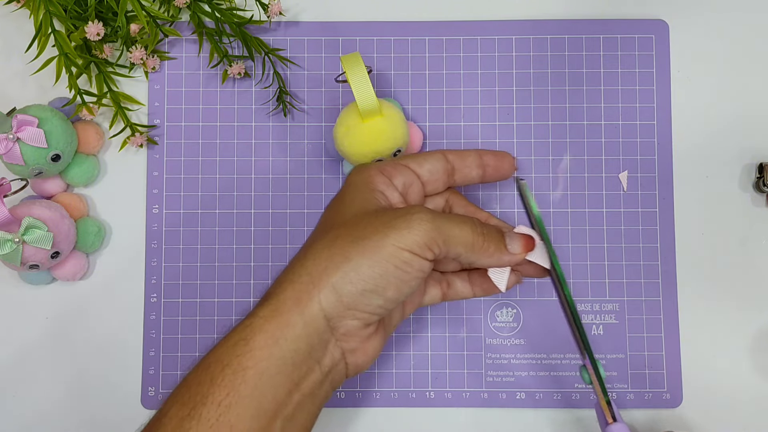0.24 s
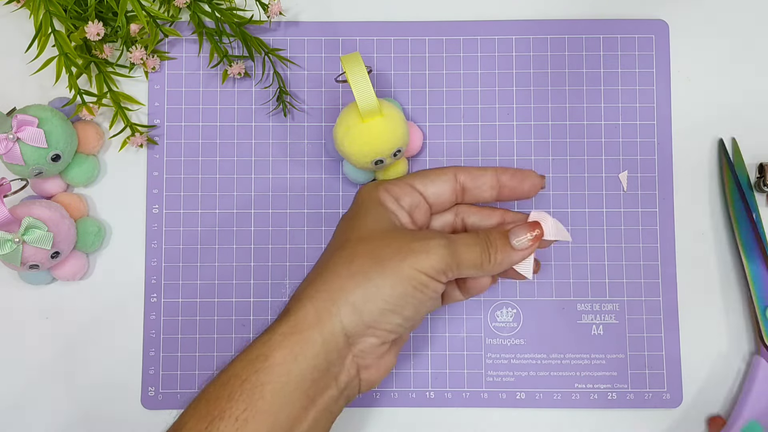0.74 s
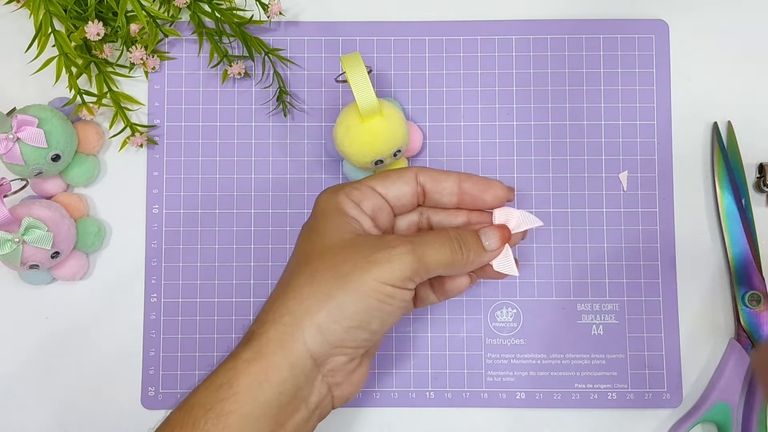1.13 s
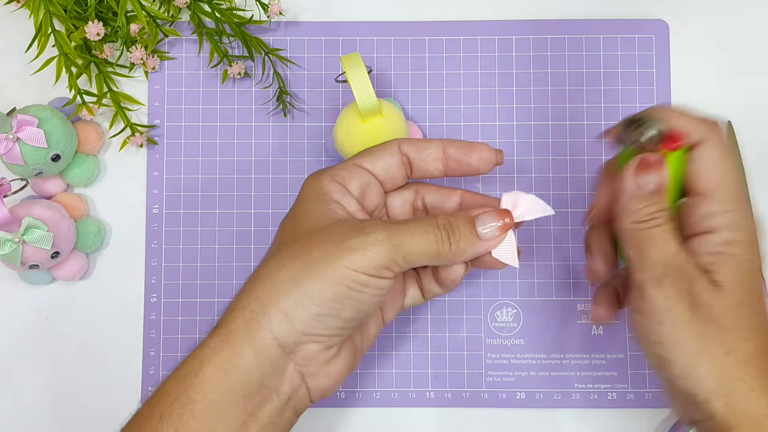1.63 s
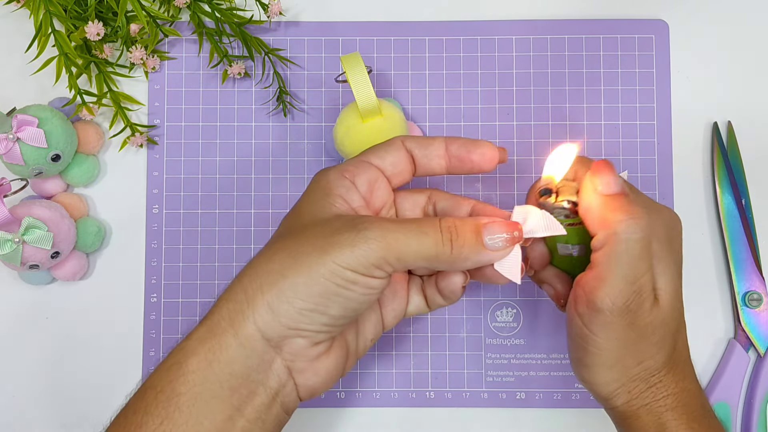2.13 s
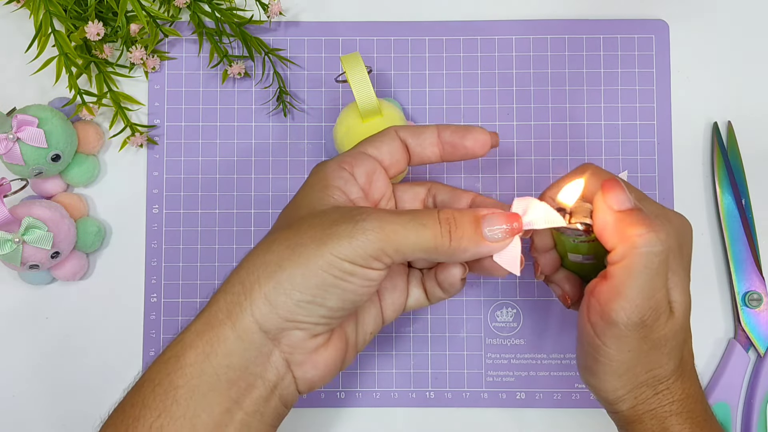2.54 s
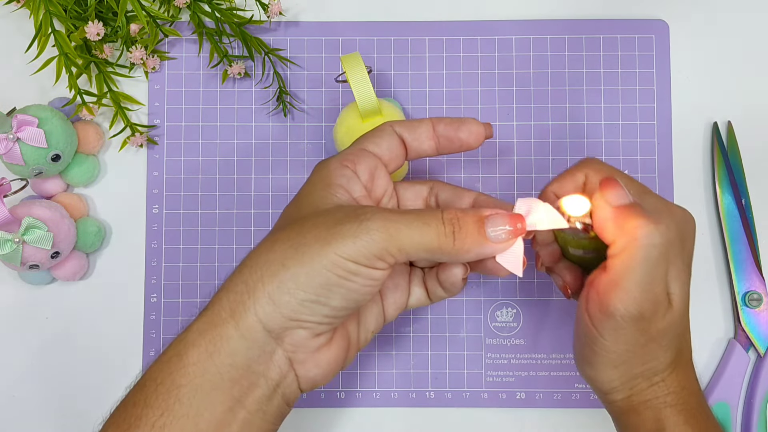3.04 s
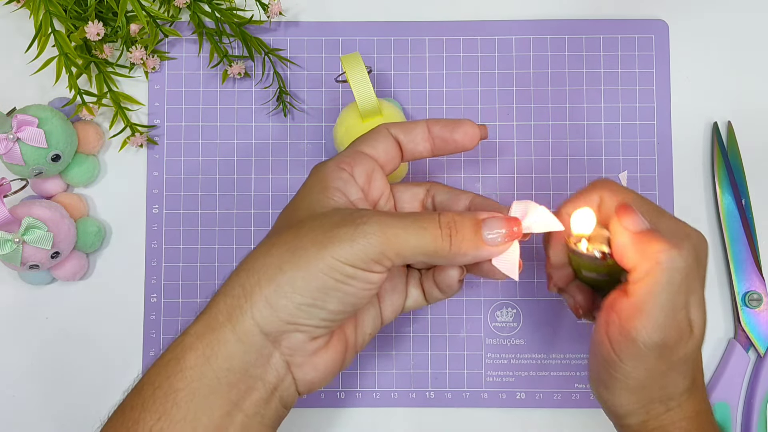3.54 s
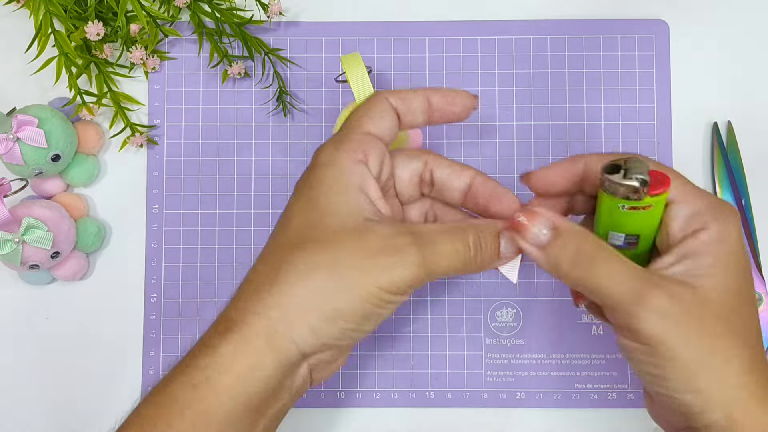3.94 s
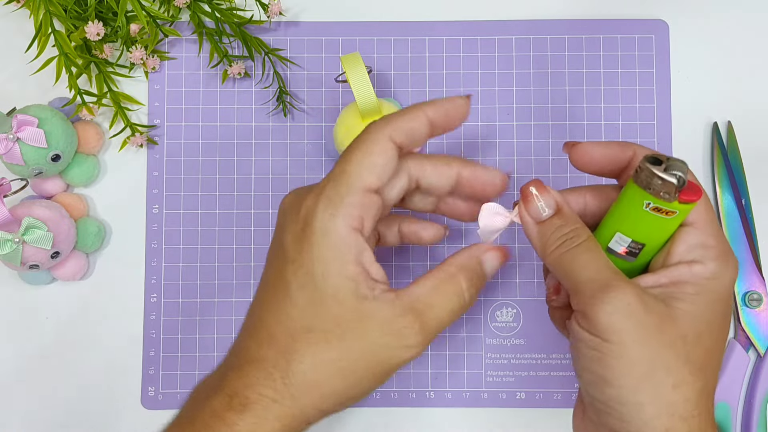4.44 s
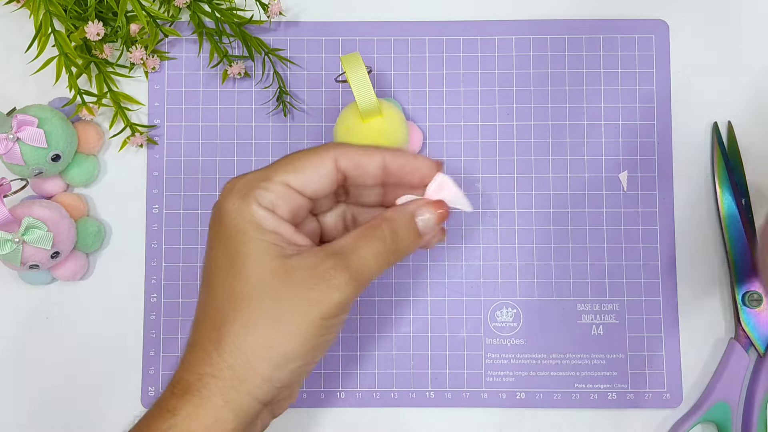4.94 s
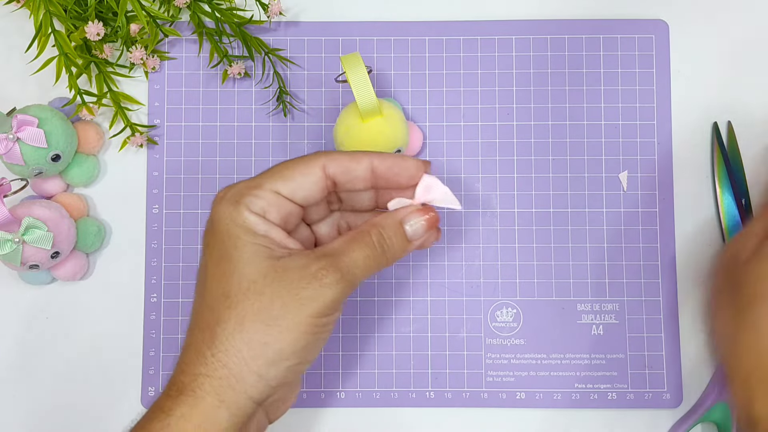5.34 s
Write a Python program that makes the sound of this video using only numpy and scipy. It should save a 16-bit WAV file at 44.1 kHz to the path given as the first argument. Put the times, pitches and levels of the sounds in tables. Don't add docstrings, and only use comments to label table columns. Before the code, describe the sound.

Soft low room noise lies under everything. Scissors give one thin quiet snip, then clack and thud loudly onto a matted table top and settle. Fingers rustle lightly; a lighter flint gives a quick bright zip ending in a tiny click. Small release clicks and near silence follow before the lighter lands hard, rattles and settles. Close microphone, short room tail, loudest hits squashed and overloaded.

```python
import sys
import numpy as np
from scipy import signal
from scipy.io import wavfile
from scipy.ndimage import uniform_filter1d

SR = 44100
rng = np.random.default_rng(int(sys.argv[2]) if len(sys.argv) > 2 else 0)


def pcm_store(signal):
    levels = np.round(np.clip(np.atleast_2d(signal), -1, 1) * 32767)
    wavfile.write(sys.argv[1], SR, levels.astype(np.int16).T)


def convert_level_to_amplitude(level_db):
    exponent = np.asarray(level_db, float) / 20
    return 10 ** exponent


N = 246959


def rms_one(x):
    return x / np.sqrt(np.mean(x ** 2) + 1e-20)


def at_hz(points, hz):
    table = np.array(points)
    return np.interp(np.log(hz), np.log(table[:, 0]), table[:, 1])


def filt(x, kind, hz, order=2):
    return signal.sosfilt(signal.butter(order, hz, kind, fs=SR, output="sos"), x)


def resonate(x, hz, width_hz):
    r = np.exp(-np.pi * width_hz / SR)
    numerator = (1 - r * r) / 2 * np.array([1, 0, -1])
    return signal.lfilter(numerator, [1, -2 * r * np.cos(2 * np.pi * hz / SR), r * r], x)


def stereo_white(length, alike):
    mid, side = rng.standard_normal((2, length))
    return np.sqrt(.5 + alike / 2) * mid + np.sqrt(.5 - alike / 2) * side * [[1], [-1]]


def bands():
    edges = 14 * 2 ** np.arange(0, 10.2, 1 / 3)
    return list(zip(edges, edges[1:]))


# frequency in Hz, level in dB per Hz.
AIR_SPECTRUM = [(12, 12.5), (24, 0.5), (40, -13.5), (90, -12.5), (180, -13.5), (310, -17.5), (650, -22),
                (1100, -26), (1900, -35), (3500, -42.5), (5500, -45.5), (8500, -41.5), (10500, -40.5),
                (13000, -49)]
# frequency in Hz, left minus right in dB.
AIR_BALANCE = [(60, 8.5), (110, 9.5), (200, 12), (380, 9.5), (700, 9.5), (1290, 9.5), (2380, 6),
               (4400, 1.5), (8120, 1), (15000, -5.5)]
# frequency in Hz, correlation from 0 to 1.
AIR_COHERENCE = [(30, 0), (200, 0.22), (500, 0.01), (1500, 0), (8000, 0)]
# frequency in Hz, width in Hz, level in dB.
AIR_TONES = [(59, 3.5, -48.5), (181, 8.4, -49), (227, 14.6, -53.5), (374, 14, -57.5)]


def air():
    broad, white = 0, rng.standard_normal((2, 2, N + 8000))
    for k, (low, high) in enumerate(bands()):
        hz = np.sqrt(low * high)
        a, b = filt(white[k % 2], "band", [low, high])[:, 8000:]
        alike = at_hz(AIR_COHERENCE, hz)
        left = convert_level_to_amplitude(at_hz(AIR_BALANCE, hz) / 2)
        pair = np.array([left * a, (alike * a + np.sqrt(1 - alike ** 2) * b) / left])
        broad = broad + convert_level_to_amplitude(at_hz(AIR_SPECTRUM, hz)) * pair / np.sqrt(left ** 2 + left ** -2)
    tones = 0
    for hz, width_hz, db in AIR_TONES:
        tones = tones + convert_level_to_amplitude(db) * rms_one(resonate(stereo_white(N, 0.87), hz, width_hz))
    return convert_level_to_amplitude(-37) * rms_one(broad) + tones * convert_level_to_amplitude([[4], [-5]])


def bursts(events, decay_ms, rise_s, alike):
    length = 900
    t = np.arange(length) / SR
    rise = 1 - np.exp(-t / rise_s)
    out = np.zeros((2, 2, N + length))
    for s, bright_db, body_db in events:
        i = round(s * SR)
        for k, (db, decay_s) in enumerate([(bright_db, decay_ms / 1000), (body_db, .004)]):
            shape = rise * np.exp(-t / decay_s)
            burst = rms_one(shape * stereo_white(length, alike))
            out[k, :, i:i + length] += convert_level_to_amplitude(db) * burst * np.sqrt(np.mean(shape ** 2))
    return out[:, :, :N]


def shell(x, modes):
    out = 0
    for k, (hz, width_hz, db) in enumerate(modes):
        out = out + convert_level_to_amplitude(db) * resonate(x, hz, width_hz) * (-1) ** k
    return out


# time in seconds, bright crack in dB, duller body click in dB.
CRACKS = [(.217, -49, -44), (.6636, -36.5, -59), (.7058, 3.5, 0), (.9640, 1.5, 3.5), (1.0335, -20, 3),
          (1.0400, -22, -10), (1.0540, -2.5, 1.5), (1.2935, -26.5, -30), (1.3037, -36, -19),
          (1.3104, -41, -29), (1.3385, -23, -24.5), (1.4155, -26.5, -34), (2.272, -33.5, -51),
          (2.343, -34, -55), (3.7316, -24, -29.5), (3.7444, -33, -38), (3.7544, -33.5, -56),
          (4.0058, -37.5, -52), (4.8744, -41.5, -58), (4.930, -43, -55), (5.1996, -29, 2),
          (5.238, 5.5, 2.5), (5.2665, -8, -6.5), (5.2715, -11, -9), (5.5332, -20, -18),
          (5.5523, -23, -21.5)]
# frequency in Hz, width in Hz, level in dB.
HANDLE_MODES = [(1509, 1540, 0), (1964, 1130, 2.5), (2544, 274, 1.5), (3300, 2320, -13.5)]


def cracks():
    bright, body = bursts(CRACKS, decay_ms=1.68, rise_s=0.00048, alike=0.59)
    return filt(bright, "high", 3000) + convert_level_to_amplitude(12) * shell(body, HANDLE_MODES)


def steel(x, left_db):
    sing = resonate(x, 9070, 1400)
    sing = sing + convert_level_to_amplitude(-20.5) * resonate(x, 7100, 830) + convert_level_to_amplitude(-7.5) * resonate(x, 13600, 3000)
    return (sing + convert_level_to_amplitude(-40.5) * filt(x, "high", 3840)) * convert_level_to_amplitude([[left_db], [-left_db]])


# frequency in Hz, width in Hz, level in dB.
HOOD_MODES = [(2434, 500, 1.5), (3700, 120, 2), (4500, 2100, -6), (5280, 600, -6.5)]


def bites(events):
    bright, body = bursts(events, decay_ms=1.66, rise_s=0.00066, alike=0.1)
    return convert_level_to_amplitude(14) * steel(bright, left_db=4) + convert_level_to_amplitude(11) * filt(shell(body, HOOD_MODES), "high", 1900)


def snip():
    start_s, gap_s = .2545, .0025
    strand_db, swell_db, blade_db = -42, 2.5, -39.5
    return bites([(start_s + gap_s * k, strand_db + swell_db * min(k, 2), blade_db) for k in range(5)])


def strokes(rows, rise_db_s, fall_db_s, clump_db):
    t = np.arange(N) / SR
    level_db = np.full((2, 1, N), -120.)
    for s, held_s, bright_db, body_db in rows:
        swell_loss, fade_loss = rise_db_s * (s - t), fall_db_s * (t - s - held_s)
        loss_db = np.maximum(0, np.maximum(swell_loss, fade_loss))
        level_db[:, 0] = np.maximum(level_db[:, 0], [bright_db - loss_db, body_db - loss_db])
    sticking = rms_one(filt(rng.standard_normal(N), "band", [60, 400]))
    return convert_level_to_amplitude(level_db) * rms_one(convert_level_to_amplitude(clump_db * sticking) * stereo_white(N, .4))


# time of full strength in seconds, hold in seconds,
# bright level in dB, body level in dB.
RUBS = [(.268, .003, -43, -49), (1.586, .01, -54.5, -76), (1.655, 0.00613, -42.5, -66),
        (1.716, 0.02, -44, -59), (1.775, .01, -57, -63), (1.982, .015, -32, -53),
        (2.345, 0.017, -50.5, -62), (3.82, 0.0033, -48, -56), (4.044, 0.0034, -46, -61),
        (4.288, .004, -44, -60), (4.802, 0.003, -46, -58), (4.878, .004, -52.5, -57),
        (4.932, 0.038, -55, -63), (4.98, 0.026, -50.5, -63), (5.045, .012, -50.5, -59)]


def rubs():
    bright, body = strokes(RUBS, rise_db_s=1500, fall_db_s=600, clump_db=2)
    return convert_level_to_amplitude(1.5) * steel(bright, left_db=-0.5) + convert_level_to_amplitude(12.5) * shell(body, HOOD_MODES)


def ring(clicks, hz, t60):
    r, w = convert_level_to_amplitude(-60 / (t60 * SR)), 2 * np.pi * hz / SR
    return signal.lfilter([0, np.sin(w)], [1, -2 * r * np.cos(w), r * r], clicks + 1e-18)


# time in seconds, boom in dB, upper modes in dB, damped push in dB.
THUMPS = [(0.709, -31, -11.5, -1), (0.867, -17, -40.5, -25), (.967, -8.5, -12.5, -8.5),
          (1.025, -9, -7.5, 0.5), (1.034, -13, -6, -25), (1.054, -2.5, -11, -10.5), (1.074, 1, -8, -4.5),
          (1.103, -9, -18, -8), (1.153, -26, -32.5, -17.5), (1.306, -21.5, -22.5, -39),
          (1.341, -18.5, -28.5, -21), (1.363, -23, -32, -21.5), (3.925, -53, -42.5, -44),
          (5.201, -14, -5, -1), (5.238, -47, -24, -25), (5.269, -37, -31, -35), (5.297, -42, -26.5, -32),
          (5.335, -16.5, -23.5, -18.5), (5.418, -29.5, -25.5, -23.5), (5.517, -34, -49, -33.5),
          (5.535, -48, -34.5, -37.5)]
# frequency in Hz, level in dB, t60 in seconds.
TOP_LOW_MODES = [(158, -5, .25), (190, -1, .3), (215, 0, .22), (238, -8, .09), (275, -11, .07),
                 (320, -11, .06)]
# frequency in Hz, level in dB, t60 in seconds.
TOP_UPPER_MODES = [(389, 12.5, 0.026), (453, -14, 0.04), (495, -2, 0.024), (486, 15, 0.019),
                   (604, -3.5, 0.076), (711, 2, 0.082), (741, -0.5, 0.1), (710, 0, 0.017),
                   (782, 8.5, 0.038), (853, -2.5, 0.072), (916, -15, 0.055), (1072, 1.5, 0.034),
                   (1190, -7.5, 0.0082), (1220, -6.5, 0.029), (1290, 7, 0.01)]
# frequency in Hz, level in dB, t60 in seconds.
FRAME_MODES = [(80, -11, 0.074), (99.3, 12.5, 0.2)]
# frequency in Hz, level in dB.
FLEX_PARTIALS = [(222, 2.5), (480, -19), (1030, -14)]


def thumps():
    s, boom_db, upper_db, push_db = np.transpose(THUMPS)
    at, out = np.round(s * SR).astype(int), np.zeros((2, N))
    # modes, level in dB, channel difference; the frame sways with a share of each boom
    groups = [(TOP_LOW_MODES, boom_db - 10, .1), (TOP_UPPER_MODES, upper_db - 8, .6),
              (FRAME_MODES, boom_db - 30, .15)]
    for modes, level_db, apart in groups:
        for hz, db, t60 in modes:
            clicks = np.zeros((2, N))
            chance = rng.standard_normal((len(at), 5))
            late = (np.abs(chance[:, 4]) * .003 * SR).astype(int)
            size = convert_level_to_amplitude(level_db + db + 2 * chance[:, 0]) * np.sign(chance[:, 3])
            clicks[:, at + late] = size * (1 + apart * chance[:, 1:3].T)
            out += ring(clicks, hz, t60 if hz < 350 else min(t60, .07))
    t, push_s = np.arange(1500) / SR, 0.0099
    flex = sum(convert_level_to_amplitude(db) * np.sin(2 * np.pi * hz * t) for hz, db in FLEX_PARTIALS)
    pushes = np.zeros(N)
    pushes[at] = convert_level_to_amplitude(push_db)
    out += signal.fftconvolve(pushes, flex * np.exp(-(t / push_s) ** 4))[:N]
    return filt(filt(out, "low", 5100), "high", 103, order=3)


# time of full strength in seconds,
# hold in seconds, bright level in dB, body level in dB.
SLIDES = [(.865, 0.039, -47, -44), (.915, 0.018, -41.5, -40), (1.034, 0.044, -25.5, -21.5),
          (1.304, .004, -37, -28.5), (1.335, 0.071, -41, -37), (5.243, .015, -29.5, -17),
          (5.266, 0.0075, -37, -9.5), (5.352, .01, -35, -26), (5.42, 0.0076, -59, -40),
          (5.54, .06, -36.5, -30), (5.552, .008, -37, -38.5)]


def slides():
    bright, body = strokes(SLIDES, rise_db_s=1498, fall_db_s=246, clump_db=1)
    return convert_level_to_amplitude(-2) * filt(bright, "high", 3800) + convert_level_to_amplitude(2) * filt(body, "band", [700, 3600])


def flint():
    start_s, first_gap_s, shrink = 1.9826, .006, .9
    s = start_s + first_gap_s * (1 - shrink ** np.arange(12)) / (1 - shrink)
    bite_db = np.minimum(-44.5 + 1080 * (s - start_s), -3.5)
    hood_db = -14 - 751 * np.abs(s - 2.014)
    lever = (2.0338, -31, -43)   # s, bright dB, body dB
    return bites(list(zip(s, bite_db, hood_db)) + [lever])


# frequency in Hz, t60 in seconds, level in dB.
ROOM_DECAY = [(150, 0.33, -4.5), (500, 0.3, 3), (1186, 0.26, 7), (2620, 0.29, 1.5), (4860, 0.32, 3.5),
              (8900, 0.28, -6), (12000, 0.36, 5)]


def tail():
    t = np.arange(SR // 2) / SR
    shared, apart, out = stereo_white(len(t), 0.9), stereo_white(len(t), 0.033), 0
    for low, high in bands()[9::2]:
        high = min(high * 2 ** (1 / 3), 19000)
        hz = np.sqrt(low * high)
        white = shared if low < 330 else apart
        level_db = at_hz(np.array(ROOM_DECAY)[:, ::2], hz)
        decay_db = 60 * t / at_hz(ROOM_DECAY, hz)
        out = out + filt(white, "band", [low, high]) * convert_level_to_amplitude(level_db - decay_db)
    return out * (1 - np.exp(-(t / 0.004) ** 2))


MOVES = [0, .6, .94, 1.02, 1.28, 1.9, 3.6, 5.1, 5.23, 5.5, 5.6]


def room(x, tails):
    out = np.zeros((2, N + SR))
    for start, stop, answer in zip(MOVES, MOVES[1:], tails):
        i, j = int(start * SR), int(stop * SR)
        wet = signal.fftconvolve(x[:, i:j], answer, axes=1)
        out[:, i:i + wet.shape[1]] += wet
    return out[:, :N]


CHANNEL_TOP_HZ = [9900, 8900]


def edge(x, shelf_db, end_hz):
    shelf = convert_level_to_amplitude(shelf_db) * filt(x, "band", [10000, end_hz], order=5)
    steep = []
    for hz, channel in zip(CHANNEL_TOP_HZ, x):
        sos = signal.cheby2(10, 45, hz * 1.06, fs=SR, output="sos")
        steep.append(signal.sosfilt(sos, channel))
    return np.array(steep) + shelf


# frequency in Hz, width in Hz, boost in dB.
PORT_PEAKS = [
    [(8410, 2720, 12), (3480, 1300, -5), (2640, 620, 2.5)],
    [(7640, 2700, 13.5), (3580, 1600, 1), (2480, 800, 2)],
]
PORT_BASS_DB = [4, -5]


def ports(x):
    out = np.zeros_like(x)
    for k in range(2):
        v = x[k] + (convert_level_to_amplitude(PORT_BASS_DB[k]) - 1) * filt(x[k], "low", 3750, order=1)
        for hz, width_hz, db in PORT_PEAKS[k]:
            v = v + (convert_level_to_amplitude(db) - 1) * resonate(v, hz, width_hz)
        out[k] = v
    return out


def scene():
    hard, boom, drag = cracks(), thumps(), slides()
    fine = snip() + rubs() + flint()
    tails = [tail() for place in MOVES]
    answer = room(convert_level_to_amplitude(-28) * (hard + drag) + convert_level_to_amplitude(-28.5) * boom, tails)
    fine_answer = room(convert_level_to_amplitude(-34) * fine, tails)
    direct = edge(hard + boom, -18, 13600)
    diffuse = edge(drag + answer, -37, 14700)
    light = edge(fine, -11.5, 14000) + edge(fine_answer, -23.5, 14200)
    return ports(direct + diffuse + light) + edge(air(), -10, 12800)


def band_limit(x):
    return signal.sosfilt(signal.butter(12, 16260, fs=SR, output="sos"), x)


def record(dry):
    peak_db = 20 * np.log10(np.abs(dry).max(0) + 1e-9)
    over_db = np.clip(peak_db + 2, 0, 9)
    fall_db = 45 * np.arange(N) / SR
    held_db = np.maximum.accumulate(over_db + fall_db) - fall_db
    ahead_db = uniform_filter1d(held_db, size=60, origin=-29)
    clipped = np.clip(dry * convert_level_to_amplitude(-ahead_db), -1, 1)
    mix = filt(clipped, "low", 15800, order=8)
    return band_limit(mix)


dry = scene()
out = record(dry)
pcm_store(out)
```